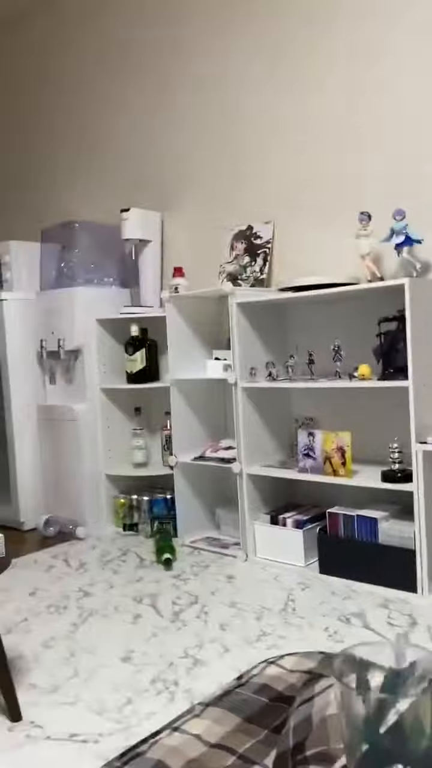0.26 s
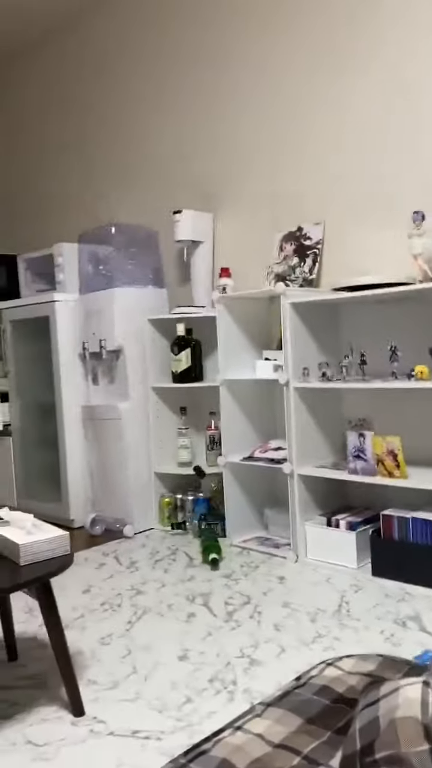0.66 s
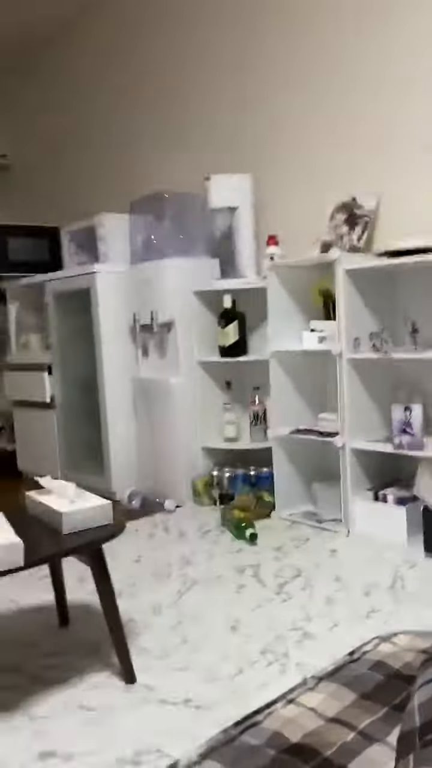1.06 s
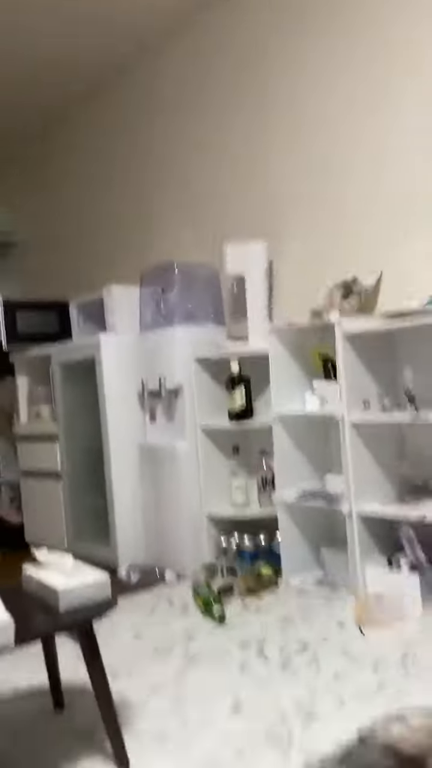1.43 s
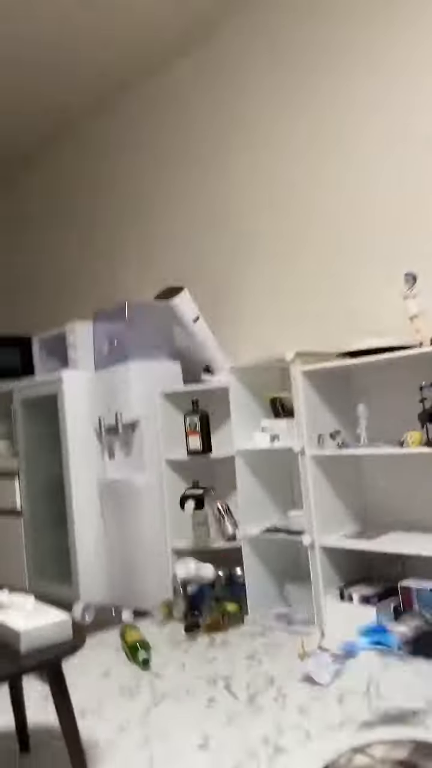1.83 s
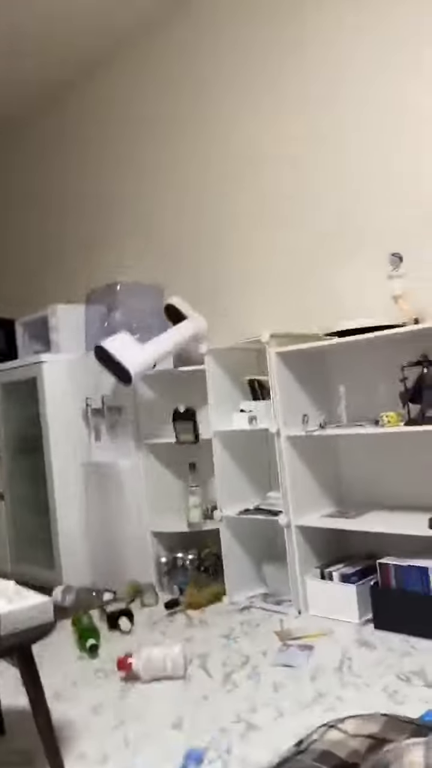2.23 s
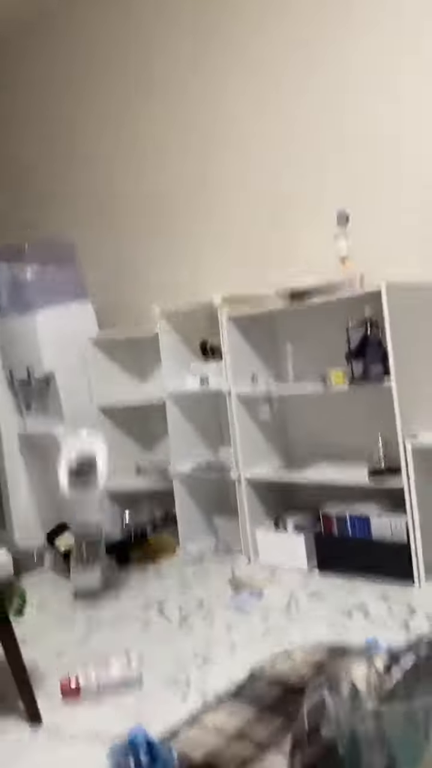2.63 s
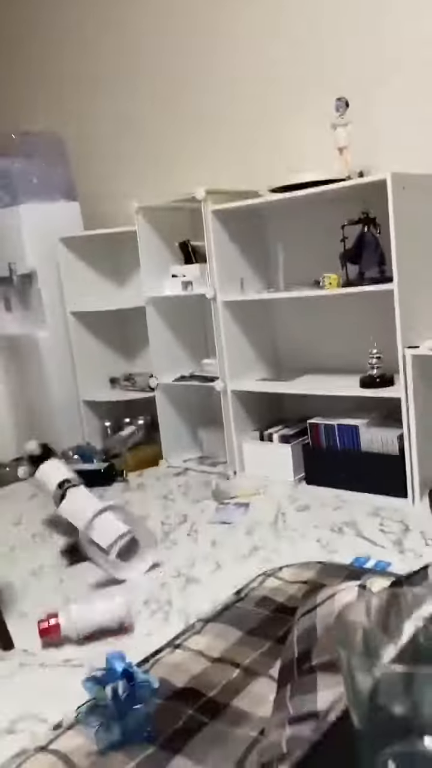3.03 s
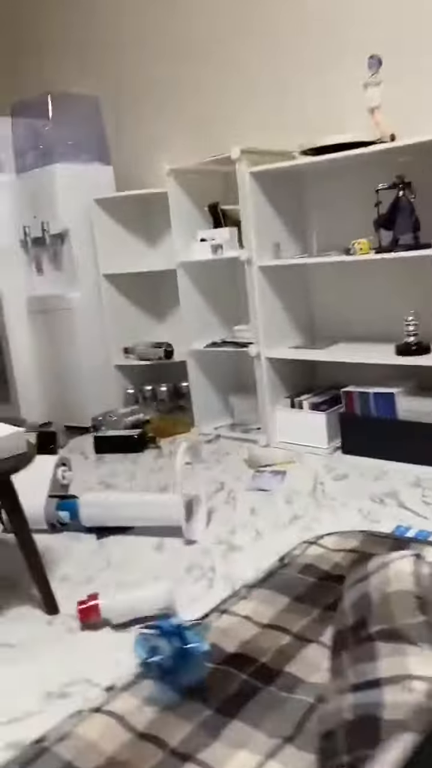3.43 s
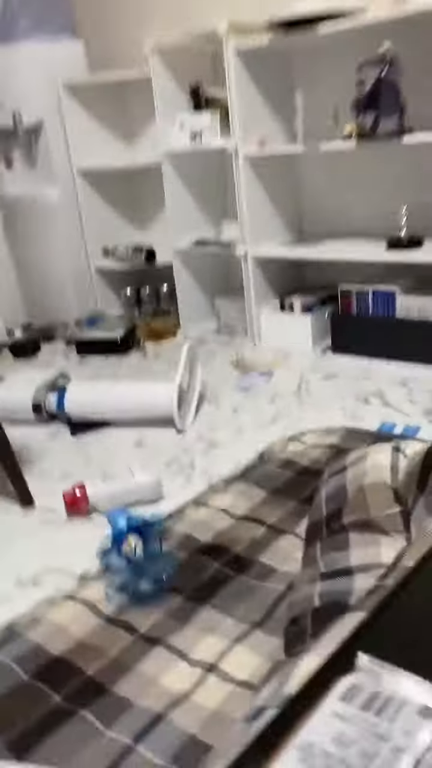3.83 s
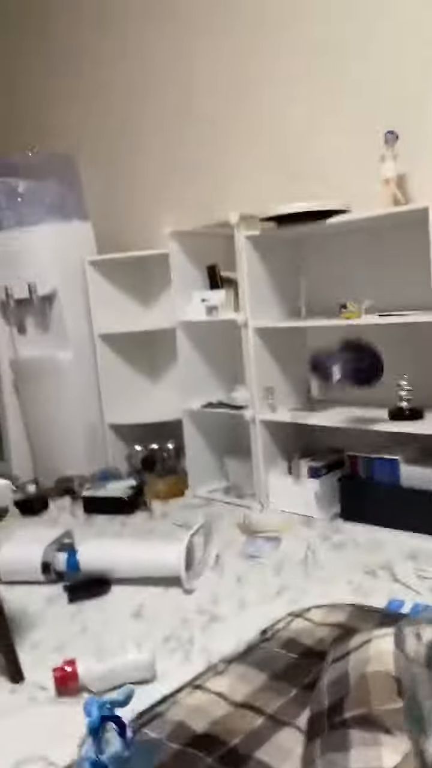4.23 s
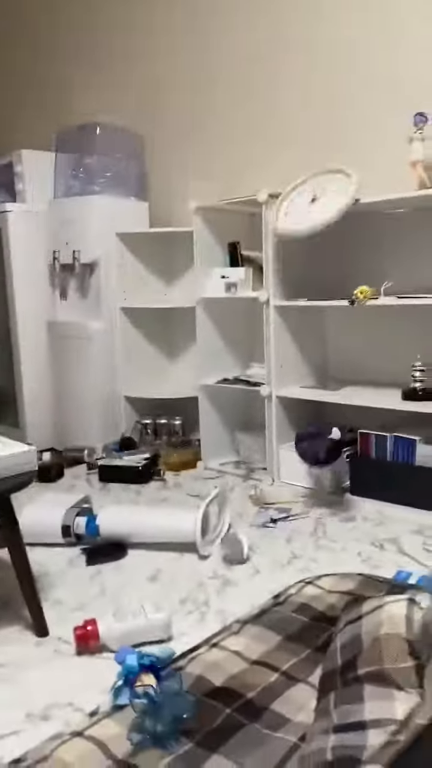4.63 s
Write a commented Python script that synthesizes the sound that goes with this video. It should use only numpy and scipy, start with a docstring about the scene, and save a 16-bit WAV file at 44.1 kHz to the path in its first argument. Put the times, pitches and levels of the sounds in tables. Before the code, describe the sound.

Shaking already under way fades in abruptly: rumbling building, rattling shelves, plastic clatter. Thumps and cracking clacks pile up, with glass clinks from about 0.8 seconds. Two further bursts of falling objects follow, the last the heaviest, with hollow canister knocks. Afterwards sparse thuds, taps and faint glass tinkles remain. Short indoor reverberation, phone stereo with softly squashed peaks, bass centred and treble wide.

```python
"""An earthquake shakes a small carpeted room; the sound fades in on a shaking already under way.
Heavy objects thud on the floor (damped swings), boards knock and hard things clack (struck modes).
From 0.8 s bottles clink, joined later by a trinket and a hollow canister (sharply tuned modes).
Furniture rattle, plastic clatter (random contacts) and building rumble (noise) ease after 3 s.
A hand-held phone records it in stereo, with a soft limit on its peaks."""
import sys
import numpy as np
from scipy import signal
from scipy.fft import rfft, irfft, next_fast_len
from scipy.io import wavfile

SR = 44100
rng = np.random.default_rng(int(sys.argv[2]) if len(sys.argv) > 2 else 0)


def nominal_scale(level):
    """Amplitude ratio for a level in decibels (scalar or array-like)."""
    x = np.asarray(level, float) / 20
    return 10 ** x


def master(y):
    """Save y as 16-bit WAV."""
    cut = np.clip(np.atleast_2d(y).T, -1, 1)
    pcm = np.round(cut * 32767)  # scale
    wavfile.write(sys.argv[1], SR, pcm.astype(np.int16))


N = 214806

# heavy landings on the floor: (time [s], level [dB], reference pitch [Hz])
LANDINGS = [(0.119, -19, 64.3), (0.293, -11, 114.6), (0.327, -7.5, 104.3), (0.368, -15, 131),
            (0.615, -11, 163), (0.659, -9.5, 301), (0.698, -9, 300), (0.752, -11, 130), (0.802, -13, 129),
            (0.816, -8, 119.5), (1.625, -11, 298.6), (1.638, -8.5, 195), (1.664, -12, 296),
            (1.773, -8, 318), (1.868, -17, 144), (1.94, -6, 158), (2.157, -7, 115.5), (2.238, -14.5, 270),
            (2.609, -16, 156), (2.708, -2, 134.6), (2.726, -6, 95.2), (2.75, -12, 95), (2.773, -10.5, 89.7),
            (2.865, -19, 104.6), (3.086, -21, 115), (3.576, -30, 93), (3.77, -17, 96), (3.842, -18, 250),
            (3.913, -27, 200), (3.969, -21, 238), (3.995, -20, 120), (4.028, -19, 230), (4.241, -8, 129.6),
            (4.583, -17.5, 100.3), (4.606, -19.5, 95), (4.636, -18, 190), (4.66, -23, 169),
            (4.68, -22, 190)]
# hard things striking: (time [s], body level [dB], nominal pitch [Hz], crack level [dB])
STRIKES = [(0.1126, -19.5, 2300, -17.5), (0.2893, -16.5, 2070, -18), (0.313, -17, 2130, -18),
           (0.4556, -18, 1790, -8), (0.581, -24, 1500, -32), (0.605, -22, 1550, -34),
           (0.647, -14, 2540, -38), (0.7328, -15, 1450, -6.5), (0.7417, -13, 1920, -7.5),
           (0.8121, -11, 2090, -8.5), (0.9731, -21.5, 1810, -28), (1.0109, -16, 1810, -3),
           (1.1762, -13, 1870, -24), (1.189, -21, 2520, -19), (1.294, -21, 2030, -18),
           (1.5024, -56, 1770, -18.5), (1.5264, -26, 1700, -17), (1.654, -23, 2100, -16),
           (1.718, -19, 2990, -27), (1.8194, -32, 2090, -16.5), (1.8384, -44, 1550, -25),
           (1.8976, -21, 2490, -17), (1.929, -18, 5000, -11), (1.9592, -18, 3270, -11),
           (1.9934, -12, 4350, -18), (2.0175, -15, 3400, -20), (2.1419, -18, 4950, -7.5),
           (2.16, -14, 1850, -29), (2.168, -11.5, 1980, -29), (2.176, -11, 2000, -3),
           (2.179, -7.5, 3630, -16), (2.2, -23, 2300, -24), (2.1886, -16, 2310, -24),
           (2.5381, -17.5, 2350, -24), (2.5745, -19.5, 2400, -14.5), (2.7057, -17, 1460, -12),
           (2.7241, -12, 2060, -7.5), (2.766, -12.5, 2390, -2.5), (2.7897, -11.5, 2210, -4.5),
           (2.852, -14, 2100, -11), (2.954, -6.5, 1790, -6), (2.9585, -14.5, 2300, -10.5),
           (2.966, -20, 2700, -12), (2.982, -14, 2110, -18), (2.9744, -24, 2500, -24),
           (3.0766, -24, 1530, -11), (3.1435, -25, 1710, -15.5), (3.1701, -18.5, 2080, -16),
           (3.2294, -21.5, 2350, -29), (3.3884, -22.5, 5300, -18.5), (3.4875, -43, 1790, -18),
           (3.755, -23.5, 1350, -39), (3.8184, -24, 2800, -27), (3.9022, -26, 5240, -31),
           (3.9774, -29.5, 1500, -25), (4.2378, -18.5, 3350, -12), (4.3352, -19, 3170, -31),
           (4.3627, -19, 3720, -34), (4.5279, -33, 2120, -19.5), (4.6506, -36, 2060, -27),
           (4.7427, -27, 2540, -17.5), (4.8209, -25.5, 2830, -22.5)]


def rms_one(x):
    """Normalization by mean power: scale to rms 1."""
    return x / np.sqrt(np.mean(x ** 2) + 1e-20)


def at_hz(points, hz):
    """Spectral interpolation: read (frequency [Hz], value) points on a log-frequency axis."""
    known_hz, values = np.transpose(points)
    return np.interp(np.log(hz + 1), np.log(known_hz), values)


def drift(corner_hz):
    """Low-passed random process: noise through two equal poles wanders slowly with spread 1."""
    hop, settle = 40, 2000      # samples per slow step, slow steps dropped
    r = np.exp(-2 * np.pi * corner_hz * hop / SR)
    noise = rng.standard_normal(N // hop + 2 + settle)
    slow = rms_one(signal.lfilter([1], [1, -2 * r, r * r], noise)[settle:])
    return np.interp(np.arange(N) / hop, np.arange(len(slow)), slow)


def ring(force, hz, t60):
    """Damped harmonic oscillator: a unit click starts a sine of height 1 that falls 60 dB in t60 [s]."""
    r = nominal_scale(-60 / (t60 * SR))
    w = 2 * np.pi * hz / SR
    return signal.lfilter([0, np.sin(w)], [1, -2 * r * np.cos(w), r * r], force + 1e-18)


def add(out, s, db, sound):
    """Superposition: sum a short sound into out at time s [s] with its own peak at db."""
    at = round(s * SR)
    sound = sound[:N - at]
    out[at:at + len(sound)] += nominal_scale(db) * sound / np.abs(sound).max()


def thuds():
    """Damped free vibration: the floor swells over about a cycle and swings out, sinking in pitch."""
    cycles_to_60_db = 20.3      # cycles of the reference pitch
    out = np.zeros(N)
    t = np.arange(round(0.4 * SR)) / SR
    for s, db, hz in LANDINGS:
        # the frequency sinks from 1.29 to 0.675 of the reference pitch
        turns = hz * (0.675 * t + 0.0179 * (1 - np.exp(-t / 0.0289)))
        swell = (1 - np.exp(-t * hz * 3.4)) ** 2
        decay = nominal_scale(-60 * t * hz / cycles_to_60_db)
        overtone = 0.4 * np.sin(2 * np.pi * 1.7 * turns + rng.uniform(0, 2 * np.pi))
        add(out, s, db, swell * decay * (np.sin(2 * np.pi * turns) + overtone))
    return out


def blow(hz, t60, spread, scatter_db, cycles, tilt_db):
    """Modal excitation: a hit and its dying shower of after-contacts ring eight short, uneven modes."""
    t = np.arange(round(0.4 * SR)) / SR
    after = rng.standard_normal(len(t)) * rng.exponential(1, len(t)) / np.sqrt(SR / hz)
    force = nominal_scale(scatter_db - 60 * t / t60) * after
    force[0] = 1
    steps = np.array([0.0, -0.1, 0.5, -1.17, 1.65, 4.5, 3.0, 9.0])      # places of the modes around hz
    ratios = np.exp(spread * steps + rng.normal(0, 0.0037, 8))
    out = np.zeros(len(t))
    for k, (ratio, step) in enumerate(zip(ratios, steps)):
        strength = nominal_scale(-tilt_db * abs(step)) * (-1) ** k
        out += strength * ring(force, hz * ratio, cycles / hz)
    return out


def knocks():
    """Heavily damped modes: boards of shelves and cabinets give a hollow, woody note."""
    # (time [s], level [dB], nominal pitch [Hz])
    hits = [(0.155, -23, 533), (0.292, -12, 560), (0.308, -12, 740), (0.327, -14, 430), (0.46, -18, 534),
            (0.524, -25, 835), (0.585, -9.5, 890), (0.598, -12, 1010), (0.614, -7, 563), (0.639, -9, 456),
            (0.712, -14.5, 620), (0.896, -23, 510), (1.348, -20.5, 880), (1.528, -14.5, 860),
            (1.624, -16, 770), (1.667, -13.5, 463), (1.772, -9, 810), (1.785, -8, 580), (1.797, -13, 814),
            (1.826, -16.5, 750), (1.878, -25, 526), (1.9, -16, 1000), (2.144, -13.5, 465),
            (2.515, -16.5, 440), (2.61, -13.5, 440), (2.696, -11.5, 490), (2.774, -6.5, 495),
            (2.788, -6.5, 1050), (3.162, -12, 570), (3.189, -14.5, 537), (3.228, -12.5, 660),
            (3.269, -15.5, 520), (3.39, -18.5, 527), (3.745, -15.5, 310), (3.799, -18.5, 331),
            (3.82, -18, 480), (3.987, -19, 425), (4.0, -18.5, 497), (4.03, -21.5, 477), (4.06, -21, 348),
            (4.238, -21, 915), (4.362, -19.5, 1030), (4.765, -23, 530), (4.822, -21.5, 860)]
    out = np.zeros(N)
    for s, db, hz in hits:
        add(out, s, db, blow(hz, t60=0.17, spread=0.216, scatter_db=-2.8, cycles=7.4, tilt_db=5.0))
    return out


def clacks():
    """Hard impact: a pitched modal body, and a broadband crack with a sharp front and dying grit."""
    out = np.zeros(N)
    t = np.arange(round(0.4 * SR)) / SR
    bright = signal.butter(1, [1800, 9500], "band", fs=SR, output="sos")
    crack_t60 = 0.22    # s
    fade = nominal_scale(-60 * t / crack_t60) + 0.65 * np.exp(-t / 0.0022)
    for s, db, hz, crack_db in STRIKES:
        add(out, s, db, blow(hz, t60=0.13, spread=0.1383, scatter_db=-2.5, cycles=22.0, tilt_db=3.0))
        grit = rng.standard_normal(len(t)) * rng.exponential(1, len(t)) * fade
        add(out, s, crack_db, signal.sosfilt(bright, grit))
    return out


def bottles():
    """Modal synthesis: each short scuffing touch strikes every mode of its object unequally."""
    # modes of three glass bottles, a hollow canister and a small trinket, one table each:
    # (frequency [Hz], relative level [dB], t60 [s])
    objects = [
        [(2048, -4, 0.13), (2105, -14, 0.06), (1960, -21, .05), (2360, -26, 0.13), (3870, -25, 0.07),
         (4300, -19, 0.042), (5000, -26, 0.036), (6270, -22, 0.028)],
        [(1510, -5, 0.2), (1860, 1, 0.08), (2048, -1, 0.4), (2085, -13, 0.12), (2930, -6, 0.12),
         (3105, -2, 0.14), (3461, -14, .07), (3828, -12, 0.08), (4204, -12, .08), (4590, -5, .045),
         (5270, -3, 0.04), (5577, -10, .05), (6030, -7, 0.05)],
        [(2305, -3.5, 0.1), (2350, -12, 0.06), (2697, -14, .05), (3400, -16, 0.04), (4420, -16, 0.03)],
        [(960, -1, 0.07), (1030, 1.5, 0.073), (1084, -8.5, 0.044), (1624, -5.5, 0.045), (1790, -3, .05),
         (2310, -17, .07), (2940, -14, 0.06), (5160, -12, 0.028)],
        [(4030, -4, .08), (4240, 0, .08), (4450, -6, .025)],
    ]
    # their touches, one table each: (time [s], nominal level [dB])
    touch_tables = [
        [(0.811, -4.5), (0.843, -11), (0.857, -11), (0.887, -14.5), (1.215, -23), (1.24, -20), (1.292, -11),
         (1.312, -15), (1.333, -13.5), (1.372, -19), (1.40, -23)],
        [(1.012, -12.5), (1.023, -21.5), (1.136, -34)],
        [(2.205, -26), (2.232, -26), (2.262, -23), (2.318, -24), (2.40, -26), (2.485, -29), (4.249, -21),
         (4.265, -21), (4.297, -22.5), (4.323, -20.5), (4.345, -24)],
        [(2.158, -20), (2.172, -14.5), (2.788, -14), (2.803, -16), (2.828, -17), (2.845, -15), (2.858, -19.5),
         (2.956, -26), (2.975, -20), (2.99, -34), (3.01, -20), (3.034, -20.5), (3.08, -23.5), (3.115, -27)],
        [(1.652, -19.5), (1.671, -26), (1.692, -30), (1.715, -29.5)],
    ]
    out = np.zeros(N)
    t = np.arange(round(0.033 * SR)) / SR
    for modes, touches in zip(objects, touch_tables):
        s, db = np.transpose(touches)
        for hz, mode_db, t60 in modes:
            force = np.zeros(N)
            chance_db = rng.normal(0, 1.5, len(s))
            force[np.round(s * SR).astype(int)] = nominal_scale(db + mode_db + chance_db)
            scuff = 0.019 * rng.standard_normal(len(t)) * np.exp(-t / 0.013)
            scuff[0] = 0.97
            out += ring(signal.oaconvolve(force, scuff)[:N], hz, t60)
    return out


def jostle(level_db, colour, per_s, cycles, uneven_db, clumpy_db):
    """Random impulse train: many small contacts, in clumps, dealt to 24 short resonances."""
    pitches = np.geomspace(colour[0][0], colour[-1][0], num=24)
    sizes = nominal_scale(uneven_db * np.minimum(rng.exponential(1, N), 3.5)) * rng.choice([-1, 1], N)
    born = rng.random(N) < per_s * nominal_scale(clumpy_db * drift(12.0)) / SR
    dealt = rng.integers(0, len(pitches), N)
    rings = np.zeros(N)
    for k, hz in enumerate(pitches):
        contacts = sizes * born * (dealt == k)
        # the factor hz evens short rings and wide spacing
        rings += hz * nominal_scale(at_hz(colour, hz)) * ring(contacts, hz, cycles / hz)
    return nominal_scale(level_db) * rms_one(rings)


def rumble(level_db, lumpy_db):
    """Band-filtered noise: the building's frame shudders, each third-octave band swelling on its own."""
    # (frequency [Hz], relative level per Hz [dB])
    colour = [(25, -30), (40, -2), (60, -7), (90, 2.9), (160, -1.5), (250, -4.5), (400, -9.5)]
    out = np.zeros(N)
    edges = 22 * 2 ** (np.arange(14) / 3)
    for low, high in zip(edges, edges[1:]):
        sos = signal.butter(2, [low, high], "band", fs=SR, output="sos")
        band = signal.sosfilt(sos, rng.standard_normal(N))
        out += band * nominal_scale(at_hz(colour, np.sqrt(low * high)) + lumpy_db * drift(12.4))
    return nominal_scale(level_db) * rms_one(out)


def shudder(lumpy_db):
    """Narrow-band noise: the slowest sway of walls and floor, in lumps."""
    # (time [s], level [dB])
    deep_levels = [(0.1, -26), (0.68, -23), (0.9, -25), (1.19, -34), (1.6, -25.5), (2.09, -33.5),
                   (2.44, -47), (2.78, -20), (2.92, -36), (3.7, -31), (4.09, -34), (4.87, -40)]
    level_db = np.interp(np.arange(N) / SR, *np.transpose(deep_levels))
    sos = signal.butter(2, [43, 78], "band", fs=SR, output="sos")
    deep = signal.sosfilt(sos, rng.standard_normal(N))
    return nominal_scale(level_db) * rms_one(deep * nominal_scale(lumpy_db * drift(11.0)))


def stirred(level_db, events, below_db, t60):
    """Energy addition: each event adds its exponentially dying power to a running level in dB."""
    power = np.zeros(N)
    for s, db, *_ in events:
        power[round(s * SR)] += nominal_scale(2 * (db + below_db))
    power = signal.lfilter([1], [1, -nominal_scale(-120 / (t60 * SR))], power)
    return 10 * np.log10(nominal_scale(2 * level_db) + power)


def room(x):
    """Diffuse reverberation: dense echoes, different at two points; the top treble dies twice as fast."""
    t60, wall_cut_hz = 0.42, 14300      # s, Hz
    t = np.arange(round(0.6 * SR)) / SR
    noise = rng.standard_normal((2, len(t))) * np.minimum(t / 0.0023, 1)
    dull = signal.lfilter(*signal.butter(1, wall_cut_hz, fs=SR), noise)
    tail = nominal_scale(-60 * t / t60)
    echoes = dull * tail + (noise - dull) * tail ** 2
    echoes = echoes / np.sqrt(np.sum(echoes ** 2, axis=1, keepdims=True))
    return signal.fftconvolve(x[None], echoes, axes=1)[:, :N]


def scene():
    """Superposition of direct and reverberant sound: every source, straight and through the room."""
    # the shaking before single blows stir it:
    # (time [s], building rumble [dB], furniture rattle [dB], small-object clatter [dB])
    shaking = [(0.27, -20, -27, -36), (0.49, -22, -21.5, -29.5), (0.77, -18, -22, -27.5),
               (1.05, -24, -28, -29.5), (1.27, -27.5, -27, -34), (1.5, -22.5, -29, -35),
               (1.87, -25, -22.5, -31.5), (2.09, -18, -24, -28.5), (2.28, -30.5, -30, -39),
               (2.51, -25, -26, -36.5), (2.61, -24, -20.5, -27.5), (2.72, -28, -21.5, -31),
               (2.91, -30, -27, -27), (3.45, -29.5, -31.5, -39), (3.82, -29, -29, -34.5),
               (4.23, -25, -30.5, -39.5), (4.5, -32, -35.5, -41.5), (4.87, -32.5, -36.5, -44.5)]
    # colours of the contacts: (frequency [Hz], relative level per Hz [dB])
    rattle_colour = [(150, -35), (250, 0.5), (350, -4), (500, -4), (750, -10.5), (1100, -7.5), (1600, -43)]
    clatter_colour = [(1200, 5), (2000, 6), (3000, 1.5), (4500, -3.5), (6500, -1), (9000, -20),
                      (12000, -16), (15000, -12.5)]
    s, *columns = np.transpose(shaking)
    rumble_db, rattle_db, clatter_db = [np.interp(np.arange(N) / SR, s, c) for c in columns]
    # a landing shakes the building; a clack scatters small bits
    rumble_db = stirred(rumble_db, LANDINGS, below_db=-8.5, t60=0.26)
    clatter_db = stirred(clatter_db, STRIKES, below_db=-9.5, t60=0.22)

    near = knocks() + clacks()      # what falls forward is heard more directly
    glass = bottles()
    rattle = jostle(rattle_db, rattle_colour, per_s=900, cycles=6.8, uneven_db=3.0, clumpy_db=1.5)
    clatter = jostle(clatter_db, clatter_colour, per_s=2500, cycles=7.6, uneven_db=4.0, clumpy_db=3.5)
    far = rattle + clatter
    low = thuds() + rumble(rumble_db, lumpy_db=4.5) + shudder(lumpy_db=3.8)

    direct = near + glass + nominal_scale(-2.5) * far + low
    to_room = nominal_scale(-4.0) * near + nominal_scale(-4.5) * glass + nominal_scale(-1) * far + nominal_scale(-8.5) * low
    return direct + room(to_room)


def roll_off(x):
    """The treble ends steeply here."""
    return signal.sosfilt(signal.butter(12, 16820, fs=SR, output="sos"), x)


def record(dry):
    """Mid-side stereo: bass is shared, the treble phase turns in steps; band and peaks are limited."""
    # (frequency [Hz], gain on the difference between the channels [dB])
    channel_spread = [(60, -35), (150, -20.5), (300, -8.5), (600, 3), (1500, -1.5), (3000, 3), (5000, -7),
                      (6300, -4), (7000, -15), (7900, -9.5), (9000, 6), (9900, -38), (11000, -28),
                      (11900, 11), (12700, -37), (14300, -34), (15000, -21)]
    # (frequency [Hz], phase of left over right channel [rad])
    channel_phase = [(0, 0), (230, 0), (550, -1.0), (1200, -1.2), (1700, 0.05), (2100, .3), (2700, 2.2),
                     (3500, .7), (4500, 1.0), (5200, .35), (6900, np.pi), (8000, np.pi), (9700, 2 * np.pi),
                     (11500, 2 * np.pi), (12700, 3 * np.pi), (14400, 3 * np.pi), (15500, 4 * np.pi),
                     (22050, 4 * np.pi)]
    size = next_fast_len(N + 4096)
    hz = np.arange(size // 2 + 1) * SR / size
    left, right = rfft(dry, size)
    shared = (left + right) / 2
    apart = (left - right) / 2 * nominal_scale(at_hz(channel_spread, hz))
    # half the turn on each channel
    turn = np.exp(0.5j * np.interp(hz, *np.transpose(channel_phase)))
    stereo = irfft(np.array([(shared + apart) * turn, (shared - apart) / turn]), size)[:, :N]

    stopband_hz, bass_cut_hz = 16371, 28
    stereo = signal.sosfilt(signal.cheby2(10, 50, stopband_hz, fs=SR, output="sos"), stereo)
    stereo = signal.sosfilt(signal.butter(2, bass_cut_hz, "high", fs=SR, output="sos"), stereo)
    start_s, fade_in_s = 0.056, 0.012
    opened = np.clip((np.arange(N) / SR - start_s) / fade_in_s, 0, 1)
    mix = 1.017 * np.tanh(stereo * opened / 1.117)      # soft limit
    return roll_off(mix)


dry = scene()
out = record(dry)
master(out)
```